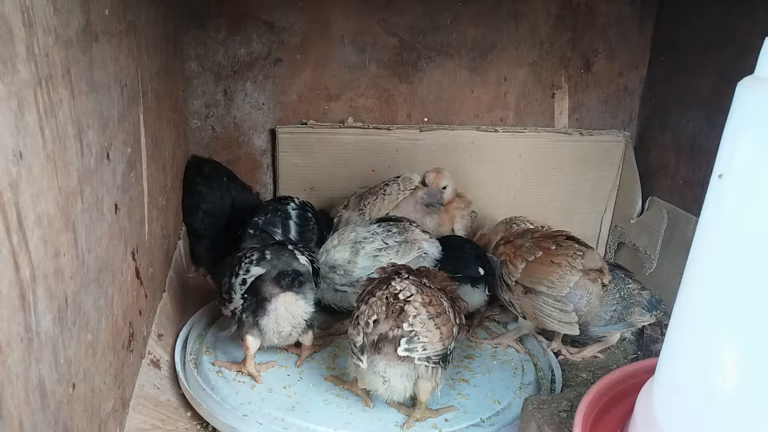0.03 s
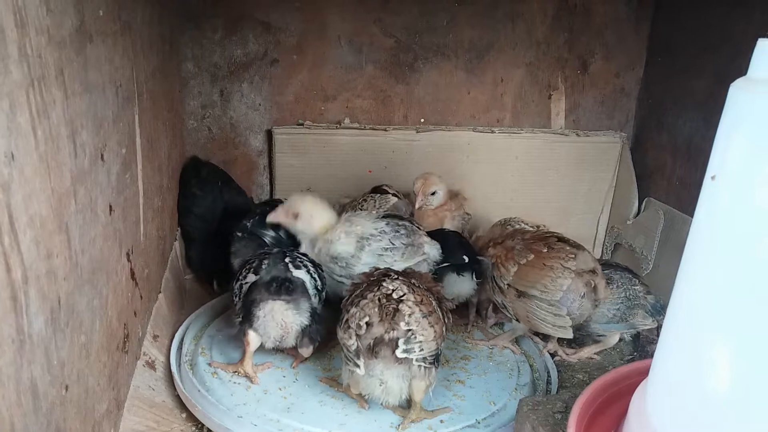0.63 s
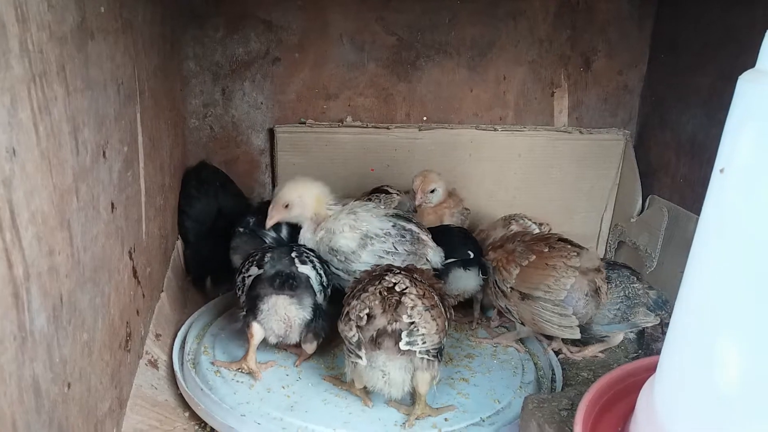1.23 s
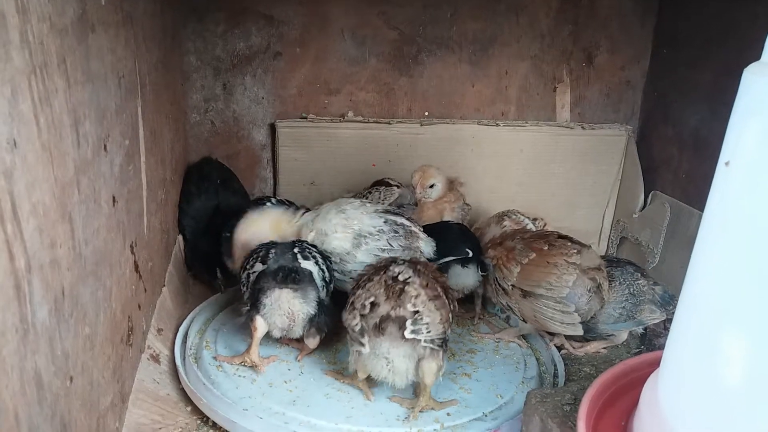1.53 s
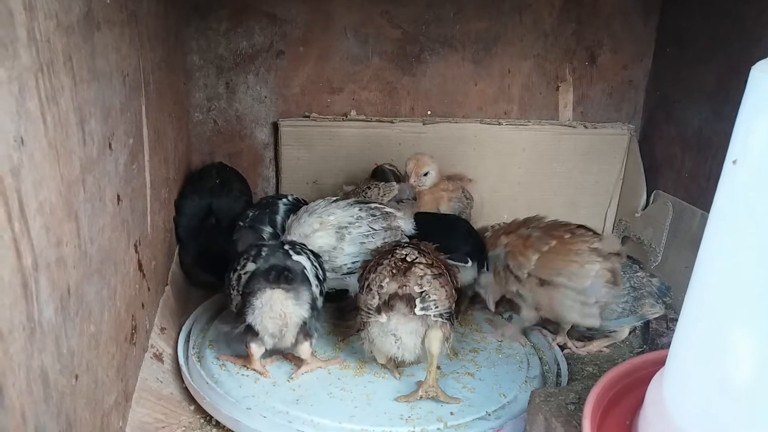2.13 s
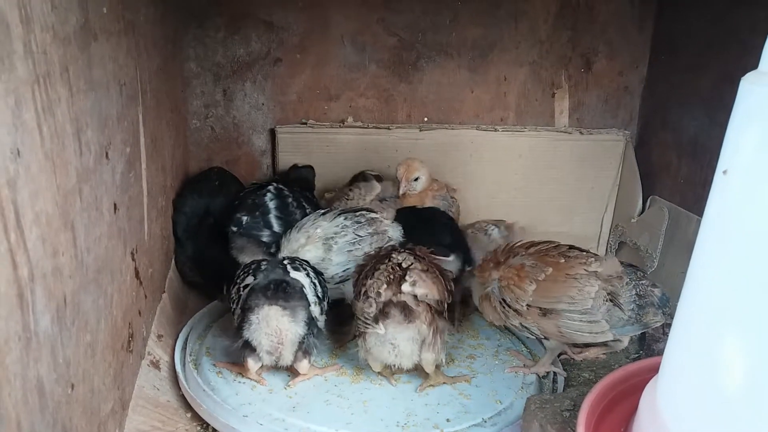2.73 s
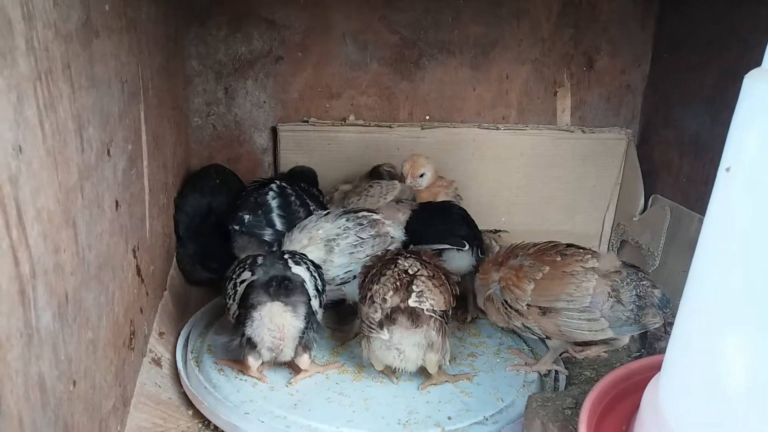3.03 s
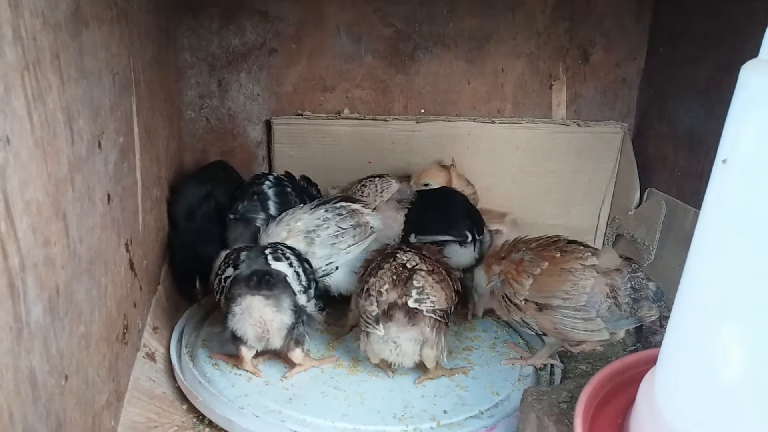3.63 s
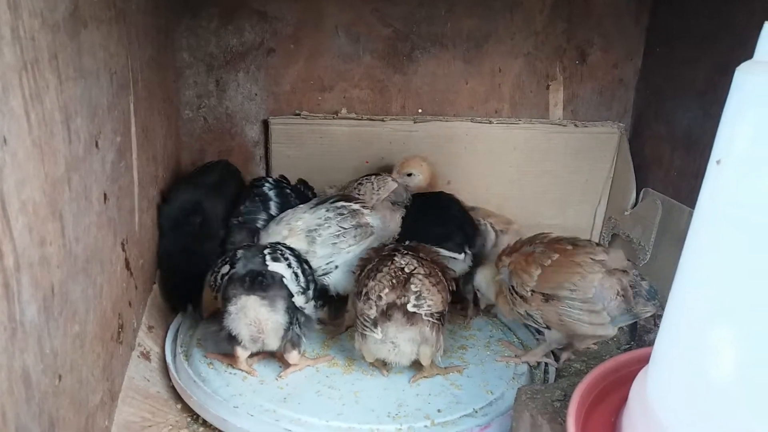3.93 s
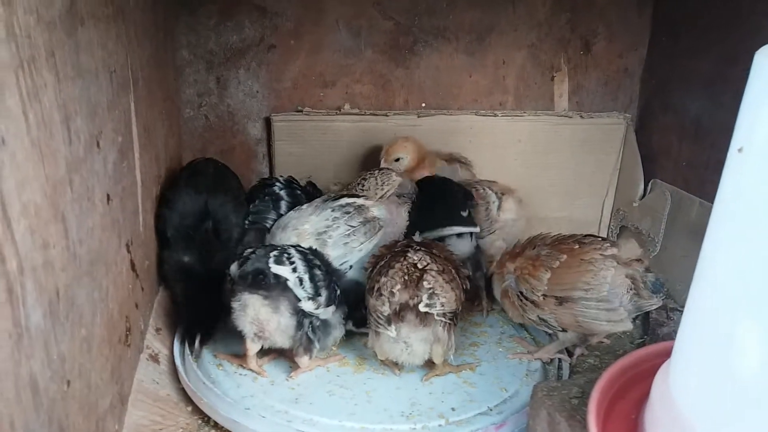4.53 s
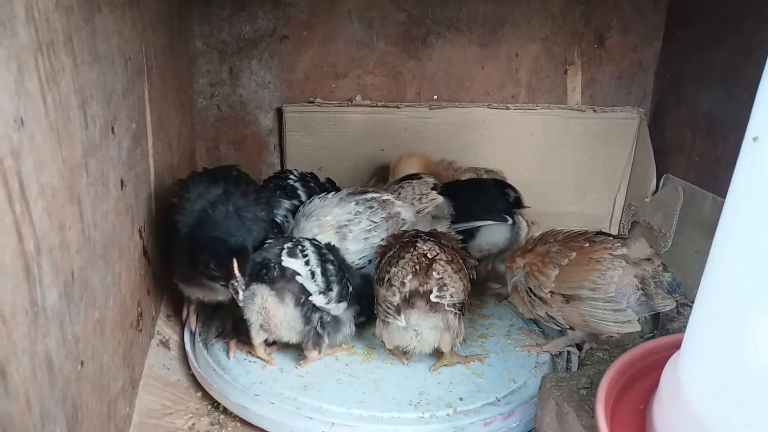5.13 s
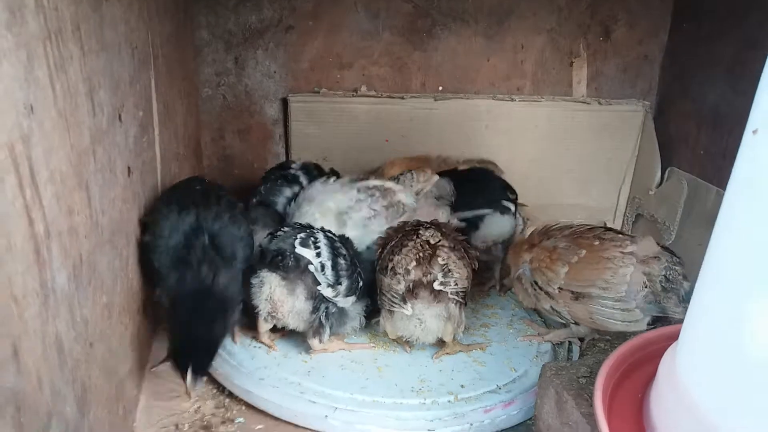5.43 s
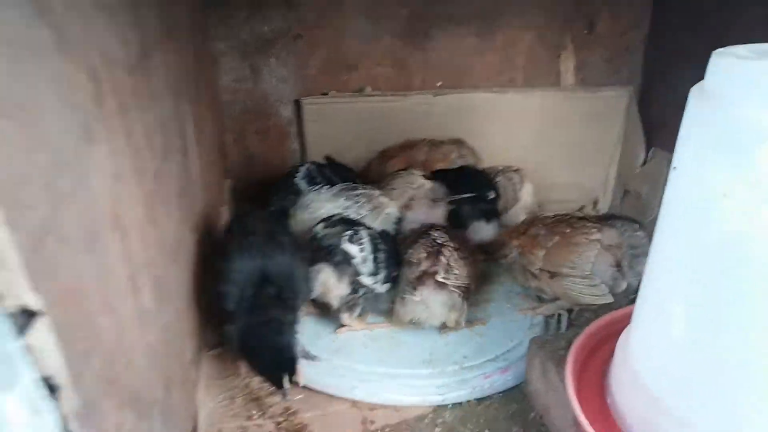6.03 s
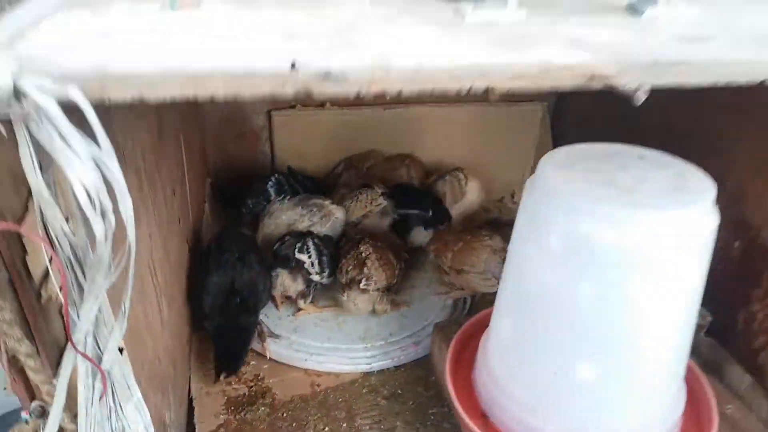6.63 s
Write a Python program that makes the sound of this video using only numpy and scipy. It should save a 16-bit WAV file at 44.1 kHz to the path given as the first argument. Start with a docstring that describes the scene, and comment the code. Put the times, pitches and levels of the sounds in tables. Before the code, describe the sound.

After a brief silence, a brood of chicks is heard at close range, peeping and pecking in a small wooden coop. Short, bright chirps and quiet pips overlap uneven knocks of beaks on a plastic tray and tiny ticks of grain. Light scratching, feather rustles and dull footfalls join in partway through. A soft low rumble lies underneath, and the near walls keep the sound tight.

```python
"""Chicks feeding in a plywood coop

A brood peeps close by in quick swoops, the two sides of the syrinx beating in the dip of a swoop,
with soft pips and throaty notes from the huddle. Beaks tap a plastic tray, feet bump the floor,
and feed and feathers rustle over a low rumble. The near walls add echoes and a very short tail."""
import sys
import numpy as np
from scipy import signal
from scipy.io import wavfile

SR = 44100
rng = np.random.default_rng(int(sys.argv[2]) if len(sys.argv) > 2 else 0)


def persist_wave(psi):
    """Save psi, clipped to +-1, as 16-bit WAV."""
    counts = np.round(np.clip(psi, -1, 1) * 32767).astype(np.int16)
    wavfile.write(sys.argv[1], SR, np.atleast_2d(counts).T)


N = 304290
TIME = np.arange(N) / SR
# tone of a beak strike: (frequency [Hz], gain [dB])
BEAK_EQ = [(250, -3.5), (900, 3), (1520, 1), (2200, 2), (3200, -2), (4300, -6), (6000, -27.5),
           (11000, -61.5)]


def amp(db):
    return 10 ** (np.asarray(db) / 20)


def unit(x):
    return x / np.sqrt(np.mean(x ** 2) + 1e-20)


def curve_at(points, hz):
    """Read a (frequency, value) curve on a log-frequency axis."""
    f, value = np.transpose(points)
    return np.interp(np.log(hz + 1), np.log(f), value)


def add(mix, start, sound):
    part = mix[round(start * SR):][:len(sound)]
    part += sound[:len(part)]


def colour(x, eq, size=4096):
    """Minimum-phase EQ through (frequency, gain) points."""
    log_gain = np.log(amp(curve_at(eq, abs(np.fft.fftfreq(size, 1 / SR)))))
    taps = np.fft.ifft(np.exp(np.conj(signal.hilbert(log_gain)))).real
    return signal.fftconvolve(x, taps[:size // 2])[:len(x)]


def bandpass(x, low_hz, high_hz):
    return signal.lfilter(*signal.butter(2, [low_hz, high_hz], "band", fs=SR), x)


def wander(n, hz):
    """Random drift that turns hz times a second."""
    return np.interp(np.arange(n) * hz / SR, np.arange(n), rng.standard_normal(n))


def glide(t, times, values):
    """Ease from one value to the next."""
    index = np.arange(len(times))
    place = np.interp(t, times, index)
    return np.interp(place // 1 + np.sin(place % 1 * np.pi / 2) ** 2, index, values)


def fade(t, attack_s=0.004, release_s=0.008):
    """Note envelope: quick in, softer out."""
    return np.clip(np.minimum((t - t[0]) / attack_s, (t[-1] - t) / release_s), 0, 1)


def swell(middle_s, half_s):
    """A smooth rise and fall around a moment."""
    return np.exp(-((TIME - middle_s) / half_s) ** 2)


def air(early_db=-42, late_db=-48, hiss_db=-68):
    """A bed of low rumble that slowly eases, over a faint steady hiss."""
    # tone of the rumble: (frequency [Hz], gain [dB])
    rumble_eq = [(45, -13.5), (82, 7.5), (130, -1), (300, -8), (650, -14), (1300, -23), (3000, -36),
                 (6000, -43.5)]
    rumble = unit(colour(rng.standard_normal(N), rumble_eq))
    return amp(np.linspace(early_db, late_db, N)) * rumble + amp(hiss_db) * rng.standard_normal(N)


def feathers(middle_s=4.0, half_s=0.78, level_db=-68.5):
    """Plumage slides on plumage in soft, uneven swishes as the chicks push past each other."""
    hiss = bandpass(rng.standard_normal(N), 7000, 9000)
    strokes = amp(6 * wander(N, 22))
    return amp(level_db) * swell(middle_s, half_s) * unit(strokes * hiss)


def patter(per_s, spread_db, decay_s=0.004):
    """Small random impacts of unequal size, each a short noise burst."""
    size = amp(spread_db * np.minimum(rng.exponential(1, N), 3))
    hits = size * (rng.random(N) < per_s / SR)
    power = signal.lfilter([1], [1, -np.exp(-2 / (decay_s * SR))], hits ** 2)
    return unit(np.sqrt(power) * rng.standard_normal(N))


def rustle(brush=0.39, fidget_db=-50.5):
    """Claws shift feed and litter while feathers brush; a hard scrape hisses brighter."""
    # bouts of scratching and jostling: (middle [s], half length [s], level [dB])
    bouts = [(0.866, 0.0159, -42), (3.007, 0.088, -48.5), (3.648, 0.058, -41), (4.028, 0.11, -43.5),
             (4.656, 0.14, -44), (5.108, 0.026, -40.5), (5.568, 0.51, -47.5)]
    # claws raking the feed: (middle [s], half length [s], level [dB])
    scrapes = [(3.945, 0.018, -36.5), (4.05, 0.0122, -35), (4.082, 0.011, -33.5), (5.077, 0.0073, -34)]
    # tone of shifting litter: (frequency [Hz], gain [dB])
    litter_eq = [(150, 5.5), (520, 2), (2300, 1), (4200, -3.5), (6200, -18.5), (8000, -19), (11000, -28.5)]
    # tone of dry feed under a claw: (frequency [Hz], gain [dB])
    rake_eq = [(1500, 4), (3700, 6), (6000, -6), (8300, -9.5), (10000, -16.5), (15500, -23.5)]
    grains = patter(per_s=170, spread_db=5.5) + brush * rng.standard_normal(N)
    stirring = amp(fidget_db) + sum(amp(db) * swell(middle, half) for middle, half, db in bouts)
    raking = sum(amp(db) * swell(middle, half) for middle, half, db in scrapes)
    hiss = unit(colour(rng.standard_normal(N), rake_eq))
    return stirring * unit(colour(grains, litter_eq)) + raking * hiss


def light_taps(pat_db=-51, click_db=-61):
    """Beaks and toes tap lightly all over: a dull pat with a small click."""
    taps = patter(per_s=30, spread_db=3)
    return amp(pat_db) * unit(bandpass(taps, 200, 850)) + amp(click_db) * unit(colour(taps, BEAK_EQ))


def steps(floor_hz=82, rise_s=0.0175, scuff=0.73):
    """The plywood floor booms briefly and unevenly under a foot."""
    # feet landing: (time [s], level [dB])
    footfalls = [(2.406, -34), (2.891, -30), (3.038, -32), (3.358, -34.5), (3.631, -25), (4.507, -33),
                 (5.117, -34.5), (5.734, -26.5), (6.217, -39)]
    out, t = np.zeros(N), np.arange(SR // 4) / SR
    envelope = t / rise_s * np.exp(1 - t / rise_s)
    for start, db in footfalls:
        uneven = signal.lfilter(*signal.butter(2, 75, "high", fs=SR), wander(len(t), 412.5))
        boom = np.sin(2 * np.pi * floor_hz * t) + scuff * uneven
        add(out, start, amp(db) * boom * envelope)
    return out


def contact(t, snap_s, rattle_s):
    """A sharp snap, then an uneven rattle of feed."""
    rattle = amp(-9 + 5 * wander(len(t), 600)) * np.exp(-t / rattle_s)
    return rng.standard_normal(len(t)) * (np.exp(-t / snap_s) + rattle)


def hit_at(db, sound, head_s=0.015):
    """Set a hit's level by its opening transient."""
    return amp(db) * sound / np.std(sound[:round(head_s * SR)])


def clacks(q=5, ring_gain=4, rise_s=0.002):
    """A beak skids onto something hard and hollow: a dry, woody clack with one broad resonance."""
    # beak strikes: (time [s], resonance [Hz], level [dB])
    strikes = [(0.558, 2400, -39), (1.385, 2116, -35), (1.545, 3100, -39), (2.81, 1590, -48),
               (4.607, 2010, -30), (6.627, 1673, -34)]
    out, t = np.zeros(N), np.arange(SR // 8) / SR
    for start, hz, db in strikes:
        skid = contact(t, 0.0054, 0.0054) * (1 - np.exp(-t / rise_s))
        beak = colour(skid, BEAK_EQ)
        ring = signal.lfilter(*signal.iirpeak(hz, q, SR), beak)
        add(out, start, hit_at(db, beak + ring_gain * ring))
    return out


def tray_knock(t, spread_db=3, detune=0.1, rise_s=0.0004, thud_db=-6):
    """The plastic tray rings over a dull thud, a little differently at every hit."""
    # tray modes: (frequency [Hz], level [dB], T60 [s])
    modes = [(316, -5, 0.071), (503.6, -2.5, 0.09), (654, 2, 0.04), (1154, -10.5, 0.03)]
    ring = np.zeros(len(t))
    for hz, db, t60 in modes:
        decay = amp(db + spread_db * rng.standard_normal() - 60 * t / t60)
        mode_hz = hz * (1 + detune * rng.standard_normal())
        ring += decay * np.sin(2 * np.pi * mode_hz * t)
    thud = bandpass(contact(t, 0.006, 0.009), 150, 950)
    return unit(ring * (1 - np.exp(-t / rise_s))) + amp(thud_db) * unit(thud)


def pecks():
    """Each hard peck knocks the tray, clacks the beak and cracks a grain."""
    # hard pecks: (time [s], tray knock [dB], grain tick [dB])
    hits = [(0.703, -33.5, -60), (0.893, -42, -45), (1.087, -49.5, -35.5), (1.319, -38.5, -51.5),
            (1.151, -44, -44.5), (1.235, -58, -42), (1.433, -37.5, -46), (1.468, -34.5, -42.5),
            (1.636, -35, -38.5), (1.658, -38.5, -49), (1.768, -34.5, -60), (1.986, -31.5, -48.5),
            (2.164, -37, -53), (2.258, -30.5, -40), (2.29, -40, -46), (2.4, -31, -40.5),
            (2.469, -37.5, -61), (2.484, -43.5, -46.5), (2.77, -37, -45.5), (2.9, -36.5, -71.5),
            (3.056, -30, -70), (3.338, -43, -38), (3.348, -32, -42.5), (3.393, -35, -78.5),
            (3.617, -73, -35.5), (3.656, -32, -64), (3.732, -55, -35.5), (3.912, -27, -64),
            (4.018, -41, -43.5), (4.127, -47, -42), (4.159, -29.5, -69), (4.271, -31, -68),
            (4.315, -64, -37.5), (4.4, -36, -44), (4.472, -35.5, -38), (4.564, -35, -43.5),
            (4.676, -39.5, -48), (4.785, -30.5, -48), (4.875, -35.5, -47), (5.045, -32, -40.5),
            (5.1, -39, -49), (5.423, -85, -37.5), (5.479, -40.5, -44), (5.556, -38.5, -39.5),
            (5.733, -43.5, -35), (5.921, -36.5, -72), (6.256, -36, -56.5), (6.374, -45.5, -42.5),
            (6.744, -43, -71), (6.855, -89, -44.5)]
    # tone of a cracking grain: (frequency [Hz], gain [dB])
    grain_eq = [(1500, -9.5), (3500, 15.5), (6200, -5.5), (8000, -7), (9500, -19), (15500, -26.5)]
    out, t = np.zeros(N), np.arange(SR // 8) / SR
    for start, knock_db, tick_db in hits:
        tray = tray_knock(t)
        beak = colour(contact(t, 0.005, 0.010), BEAK_EQ)
        spot = signal.iirpeak(rng.uniform(1090, 3020), 12, SR)  # each spot has its own high ring
        beak += 2 * signal.lfilter(*spot, beak)
        beak_db = 0.31 * knock_db + 0.27 * tick_db - 12
        grain = colour(contact(t, 0.0022, 0.007), grain_eq)
        add(out, start, hit_at(knock_db, tray) + hit_at(beak_db, beak) + hit_at(tick_db, grain))
    return out


def wall_echoes(x, boost_db):
    """The near walls form a comb filter: a gliding voice swells and breaks as it sweeps through."""
    # early reflections: (delay [s], gain [dB])
    walls = [(.00251, -15), (.0062, -14), (.0105, -16.5)]
    out = np.zeros(len(x) + SR // 20)
    add(out, 0, x)
    for delay, db in walls:
        add(out, delay, amp(db + boost_db) * x)
    return out


def coop_tail(x, echoes_per_s=3000, size=128):
    """Close plywood walls give a dense, very short reverb, longest in the bass."""
    # decay of the coop: (frequency [Hz], T60 [s])
    decay_times = [(150, 0.18), (600, 0.0757), (8000, 0.032)]
    t = np.arange(SR // 3) / SR
    taps = rng.standard_normal(len(t)) * (rng.random(len(t)) < echoes_per_s / SR) * (t > .003)
    hz, times, spectrum = signal.stft(taps, SR, nperseg=size)
    decay = amp(-60 * times / curve_at(decay_times, hz)[:, None])
    tail = signal.istft(spectrum * decay, SR, nperseg=size)[1]
    return signal.fftconvolve(x, tail / np.linalg.norm(tail))[:N]


def clucks(length_s=0.0395, bend=0.14, third_db=-4):
    """A low, hoarse, falling voice, heard through its second and third harmonics."""
    # throaty notes: (start [s], mid-note fundamental [Hz], level [dB])
    notes = [(2.605, 731.7, -35.5), (3.259, 790.3, -41), (4.205, 755, -37.5), (5.809, 746, -37)]
    out, t = np.zeros(N), np.arange(0, length_s, 1 / SR)
    fall = np.linspace(1 + bend, 1 - bend, len(t))
    for start, hz, db in notes:
        hoarse = .055 * wander(len(t), 1200)
        phase = 2 * np.pi * np.cumsum(hz * (fall + hoarse)) / SR
        tone = np.sin(2 * phase) + amp(third_db) * np.sin(3 * phase)
        add(out, start, amp(db) * tone * fade(t))
    return out


def whistle(t, hz, jitter=0.0151, rasp=0.15):
    """One side of the syrinx: a slightly raspy near-sine that swells unevenly."""
    phase = 2 * np.pi * np.cumsum(hz * (1 + jitter * wander(len(t), 886))) / SR
    flutter = (1 + rasp * wander(len(t), 1500)) * amp(2 * wander(len(t), 200))
    return np.sin(phase) * flutter * fade(t)


def voice(t, hz):
    """The whistle through the throat, loudest where the throat resonates."""
    # throat response: (frequency [Hz], gain [dB])
    throat_eq = [(1800, 18.5), (2450, 3), (2950, 0), (3240, 6), (3520, -6.5), (4100, -10)]
    return whistle(t, hz) * amp(curve_at(throat_eq, hz))


def falling_notes(length_s=0.03083, fall=0.09):
    """A single soft voice slides down a little and stops."""
    # soft notes: (start [s], opening pitch [Hz], level before the throat [dB])
    notes = [(1.000, 2296, -44), (3.318, 2910, -37), (3.761, 2870, -35), (4.215, 3000, -36.5),
             (5.763, 2755, -40.5), (6.425, 2780, -37)]
    out, t = np.zeros(N), np.arange(0, length_s, 1 / SR)
    bend = glide(t, [0, length_s], [1, 1 - fall])
    for start, hz, db in notes:
        add(out, start, amp(db) * voice(t, hz * bend))
    return out


def pips(sag=0.036, sag_at=0.28, ends_db=-7):
    """A single voice sags a little, then glides up, easing off at both ends."""
    # soft pips: (start [s], length [s], lowest pitch [Hz], level before the throat [dB])
    notes = [(1.257, 0.0419, 2618, -30), (1.964, 0.0397, 2441, -32.5), (2.034, 0.053, 2490, -29),
             (2.307, 0.062, 2324, -37), (2.904, 0.028, 2638, -35.5), (2.931, 0.0459, 2334, -36),
             (2.981, 0.025, 2570, -25), (3.583, 0.065, 2323, -41.5), (3.814, 0.0346, 2589, -30.5),
             (3.927, 0.063, 2377, -32), (4.327, 0.024, 2630, -27), (4.476, 0.0708, 2472, -33),
             (4.553, 0.031, 2730, -31.5), (5.19, 0.033, 2620, -29), (5.512, 0.063, 2194, -35),
             (5.949, 0.027, 2596, -26.5), (6.048, 0.045, 2337, -33), (6.475, 0.021, 2500, -29.5)]
    out = np.zeros(N)
    for start, length, hz, db in notes:
        t = np.arange(0, length, 1 / SR)
        rise = 0.473 * (0.0333 / length) ** 0.68  # shorter pips leap further
        bend = glide(t, [0, sag_at * length, length], [1 + sag, 1, 1 + rise])
        arch = amp(db + ends_db * np.linspace(-1, 1, len(t)) ** 2)
        add(out, start, arch * voice(t, hz * bend))
    return out


def peeps(scoop=0.91, droop=0.9, apart_hz=270, open_db=-23.5, shade=0.32):
    """A peep scoops up, dips and flicks up; in the dip the syrinx's second side beats with the first."""
    # full peeps: (start [s], length [s], first crest [Hz], dip [Hz], last crest [Hz], level before
    # the throat [dB], swell in the dip [dB], swell at the last crest [dB], second side's share [0-1])
    swoops = [(0.753, 0.065, 2660, 2291, 3094, -30, -8.5, 7, 0.9),
              (0.942, 0.0554, 2832, 2610, 3036, -16, -16.5, -3, 0.03),
              (1.187, 0.061, 3156, 2690, 3721, -23.5, -3.5, -4.5, 0.31),
              (1.691, 0.064, 2641, 2368, 3308, -15.5, -13.5, -10, 0.3),
              (1.857, 0.058, 3133, 2520, 3770, -20.5, -6, -1, 1),
              (2.068, .055, 3480, 2949, 3960, -16, -0.5, 0.5, 0.26),
              (2.221, 0.054, 2835, 2520, 3020, -28, -22, 3, 0.97),
              (2.508, 0.067, 3192, 2559, 3335, -23.5, -10, 1.5, 0.93),
              (2.711, 0.047, 3574, 3172, 3640, -16.5, 3, 0, 0.03),
              (3.046, .080, 3070, 2490, 3820, -26.5, -9, -2.5, 0),
              (3.173, 0.07, 3049, 2464, 3530, -22.5, -1, -1, 0.54),
              (3.46, 0.059, 3640, 2440, 3570, -24, -3.5, 1.5, 0.87),
              (4.066, 0.062, 3186, 2620, 3450, -28.5, 1.5, 6.5, 0.58),
              (4.236, .055, 3360, 2435, 3480, -27.5, -1, -2.5, 0.3),
              (4.433, 0.046, 3340, 2607, 3396, -26, -3, 1.5, 0.48),
              (4.787, 0.067, 3008, 2450, 3189, -27.5, -5, -7, 0.8),
              (5.402, 0.048, 2884, 2604, 3400, -36, 11, 10.5, 0.02),
              (5.644, 0.056, 3350, 2370, 3220, -39.5, 20, 2, 0.02),
              (6.3, 0.0627, 2856, 2530, 3224, -21.5, -12, -12.5, 0.63),
              (6.493, 0.061, 3331, 2500, 4180, -27.5, -9, 3, 0.74)]
    # second harmonic, brighter in the later peeps: (time [s], level at the first crest [dB])
    brightness = [(4.15, -60), (4.24, -44), (5.7, -43), (6.5, -48.5)]
    out = np.zeros(N)
    for start, length, crest_hz, dip_hz, last_hz, db, dip_db, last_db, share in swoops:
        t = np.arange(start, start + length, 1 / SR)
        turns = start + length * np.array([0, .15, .58, .87, 1])  # onset, crest, dip, crest, end
        hz = glide(t, turns, [scoop * crest_hz, crest_hz, dip_hz, last_hz, droop * last_hz])
        beat_hz = apart_hz * (1 + .2 * wander(len(t), 30))
        joining = share * np.sqrt(np.interp(t, turns, [0, 0, 1, 0, 0]))
        effort = amp(db + glide(t, turns[1:-1], [0, dip_db, last_db]))
        overtone_db = np.interp(start, *np.transpose(brightness)) + glide(t, turns[1:-1], [0, -11, -9.5])
        overtone = amp(overtone_db) * whistle(t, 2 * hz)
        peep = effort * (voice(t, hz) + joining * voice(t, hz - beat_hz)) + overtone
        # peeps softer than open_db are shaded by the huddle, so their echoes stand out
        shortfall_db = max(open_db - db - max(dip_db, 0), 0)
        add(out, start, wall_echoes(peep, shade * shortfall_db))
    return out


def scene(voice_send_db=-17, feeding_send_db=-15, huddle_db=4):
    """Voices and feeding share the coop's reverb; soft notes from the huddle get stronger echoes."""
    voices = peeps() + wall_echoes(pips() + falling_notes() + clucks(), huddle_db)[:N]
    feeding = pecks() + clacks() + light_taps() + rustle() + feathers()
    tail = coop_tail(amp(voice_send_db) * voices + amp(feeding_send_db) * feeding)
    return (voices + feeding + tail + steps() + air())[None]


def record(dry, low_cut_hz=48, high_cut_hz=15950):
    """Shed the deepest bass, fade in after a silent start and trim the very top."""
    lean = signal.sosfilt(signal.butter(4, low_cut_hz, "high", fs=SR, output="sos"), dry)
    fade_in = np.interp(TIME, [.405, .5, .68], [0, .3, 1])
    high_cut = signal.firwin(511, high_cut_hz, window=("kaiser", 9), fs=SR)
    return signal.oaconvolve(lean * fade_in, high_cut[None], "same")


dry = scene()
out = record(dry)
persist_wave(out)
```